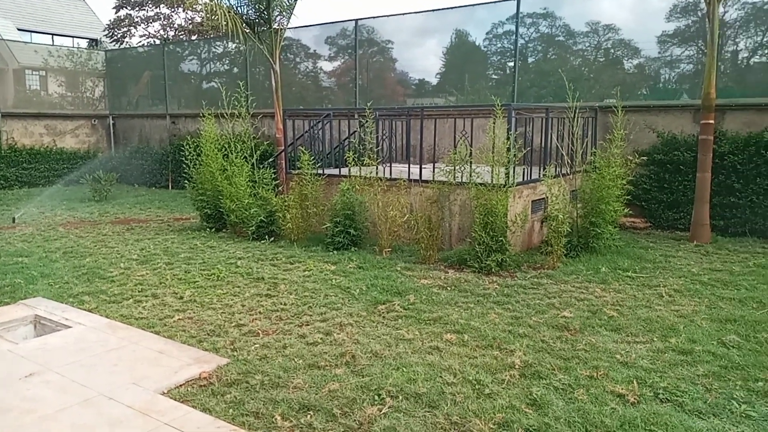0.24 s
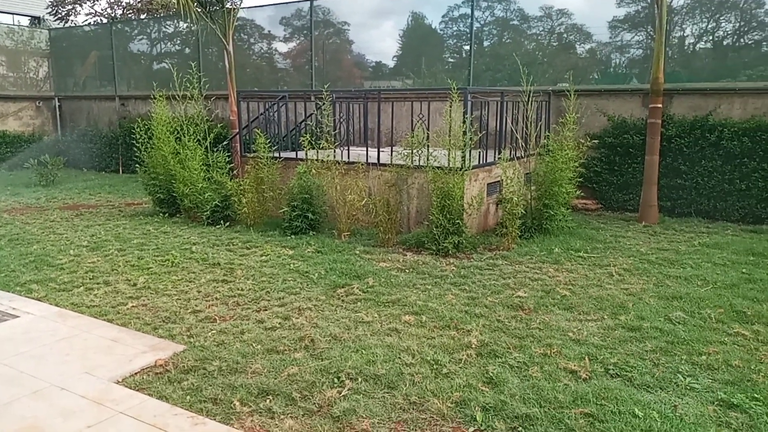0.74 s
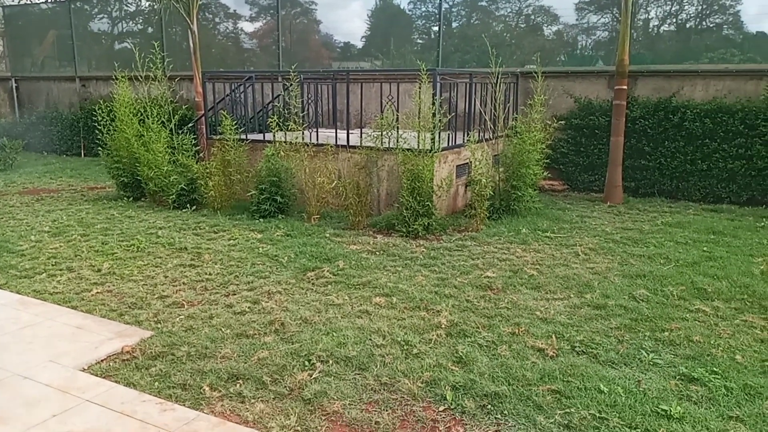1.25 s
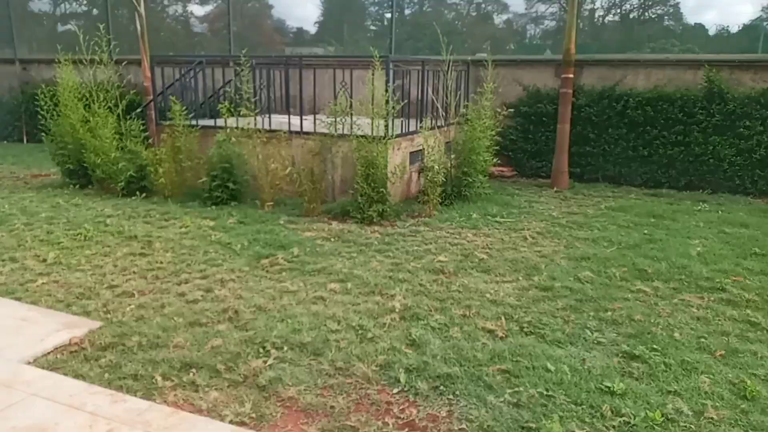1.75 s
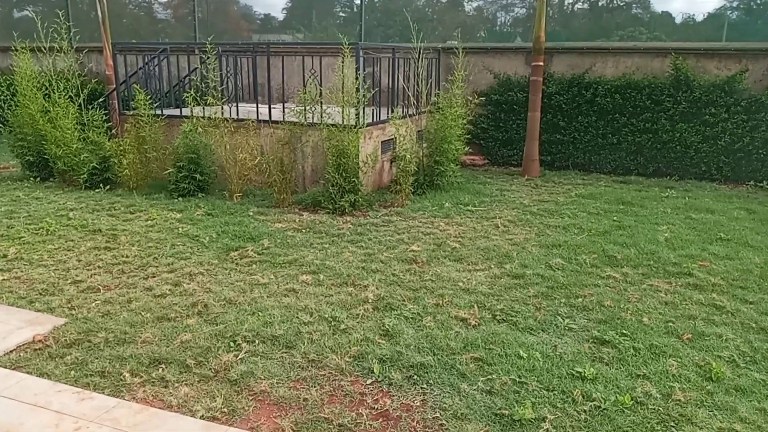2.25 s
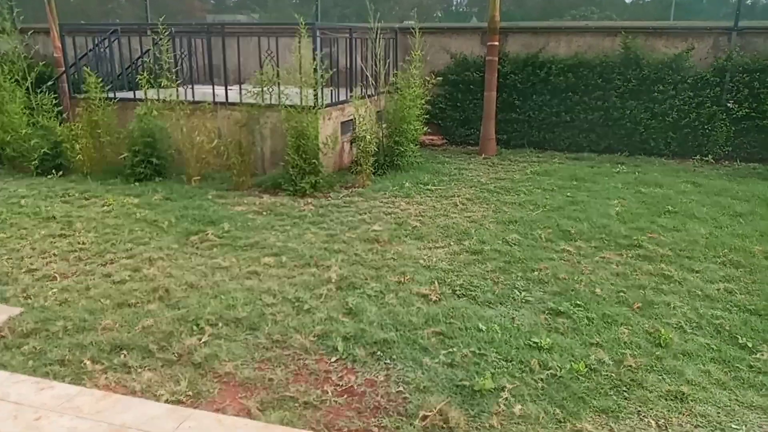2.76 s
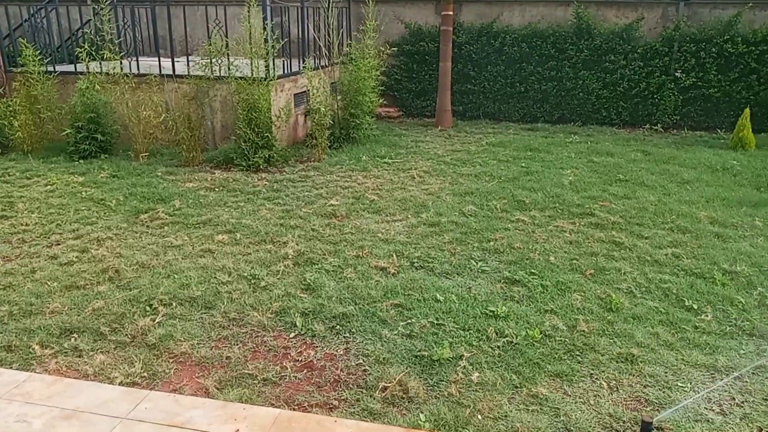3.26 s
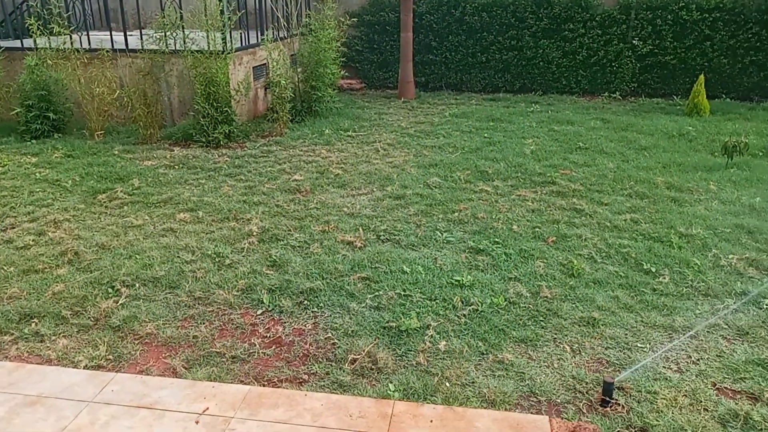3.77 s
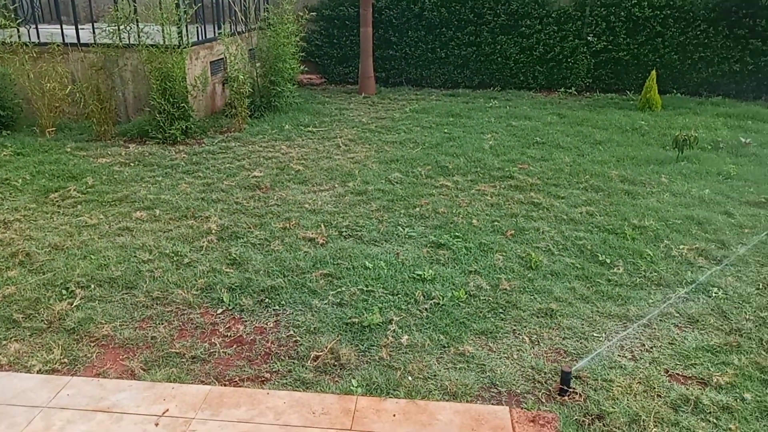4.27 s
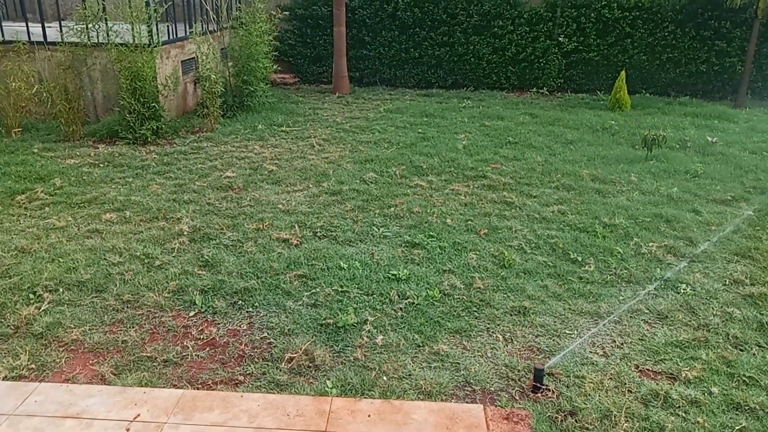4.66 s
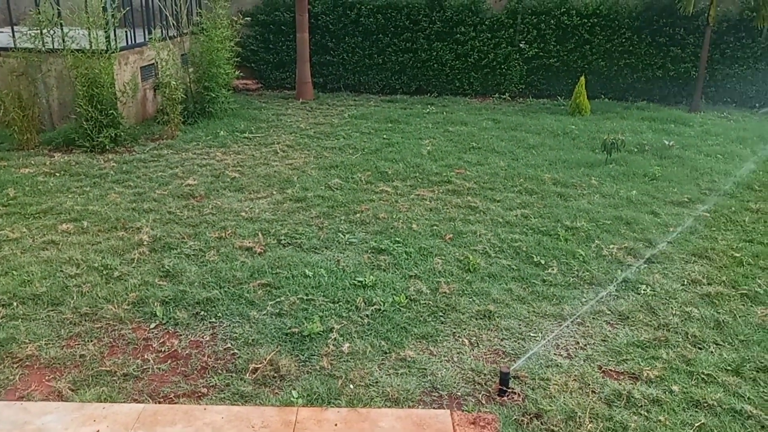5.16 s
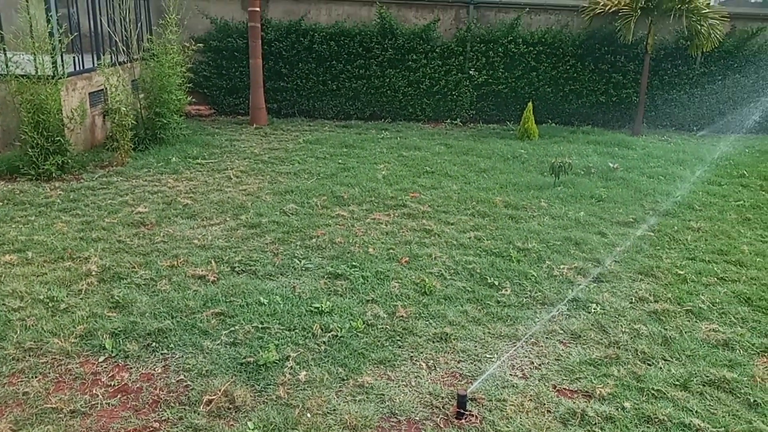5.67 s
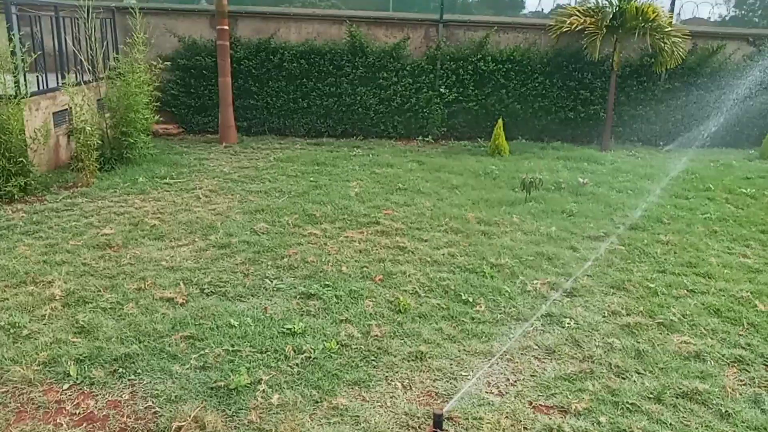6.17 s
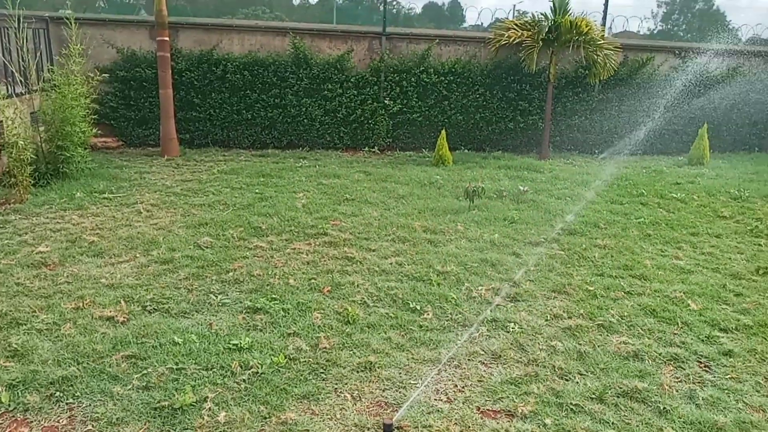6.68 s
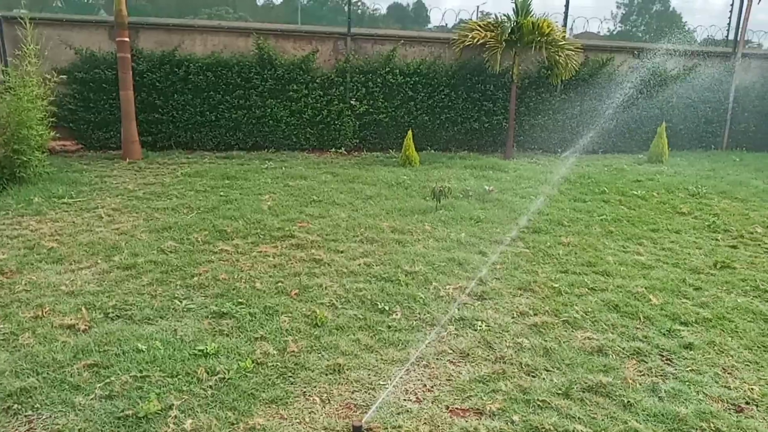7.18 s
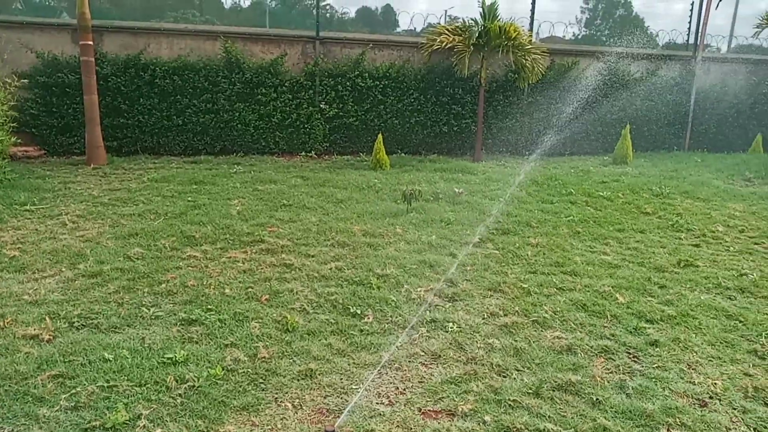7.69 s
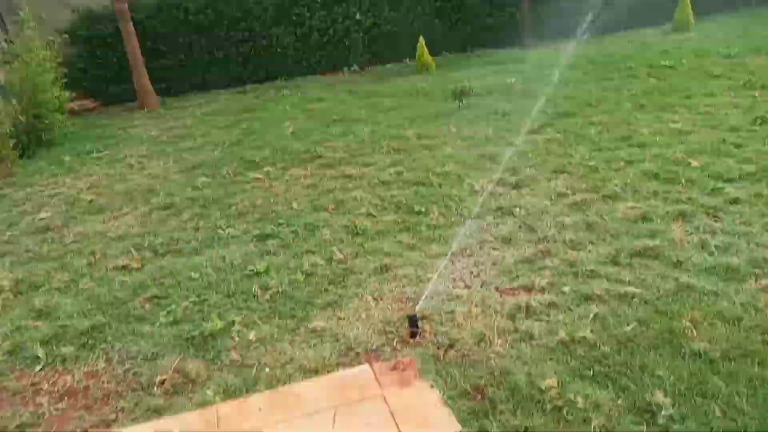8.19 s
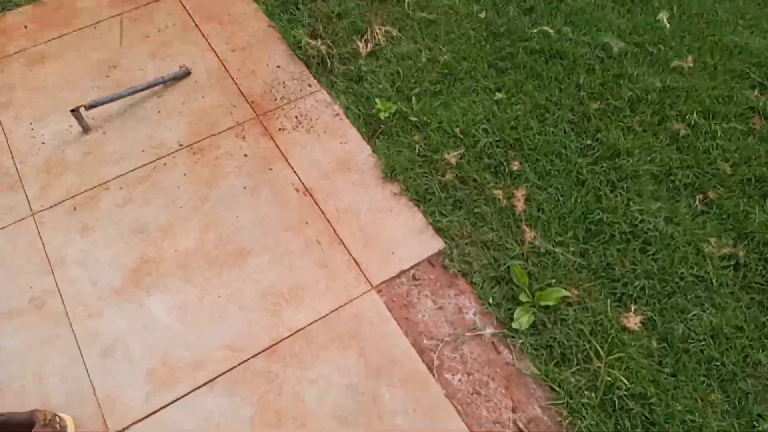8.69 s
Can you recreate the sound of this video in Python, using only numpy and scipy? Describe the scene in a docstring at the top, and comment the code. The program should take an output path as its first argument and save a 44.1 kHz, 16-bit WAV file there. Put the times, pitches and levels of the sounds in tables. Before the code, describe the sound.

A sprinkler hisses steadily over a garden lawn, spitting in short clusters of sharp ticks. Gusts rumble and thump on the hand-held microphone for the first couple of seconds, then ease off. Shoes knock and scuff on gritty tiles early on and again near the end. The hiss shifts in tone as the microphone turns. Two tiny bird chirps at the start and a distant pump hum are barely audible.

```python
"""A lawn by a tiled terrace: a pop-up sprinkler hisses as its jet breaks into droplets, and spits when
air pockets pop at the nozzle. The hiss changes colour as a hand-held camera pans and finally tilts down.
Gusts rumble and thump on the two microphone ports, shoe soles scuff over grit and knock on the tiles,
a far pump hums and a bird chirps faintly."""
import sys
import numpy as np
from scipy import signal
from scipy.fft import rfft, irfft, next_fast_len
from scipy.io import wavfile
from scipy.ndimage import uniform_filter1d

SR = 44100
rng = np.random.default_rng(int(sys.argv[2]) if len(sys.argv) > 2 else 0)


def transcribe(u):
    """Save the signal u as a 16-bit wav file named by the first command-line argument.

    u: samples, shape (n,) or (channels, n), limited to [-1, 1]; the rate is SR.
    q: integer samples, one column per channel.
    """
    v = np.clip(np.atleast_2d(u).T, -1, 1)
    q = np.round(v * 32767).astype(np.int16)
    wavfile.write(sys.argv[1], SR, q)


N = 394165

# strength of the wind: (time [s], left port [dB], right port [dB])
GUSTS = [(0, -21.5, -30.5), (.09, -50, -44), (.19, -42, -37.5), (.33, -49, -51), (.5, -31, -40),
         (.7, -31, -48), (.99, -33, -44), (1.08, -28.5, -45), (1.27, -31.5, -50), (1.39, -21, -41),
         (1.55, -35.5, -58), (1.8, -36.5, -48), (2.04, -26, -57), (2.27, -48, -48.5), (2.45, -51, -61),
         (2.52, -54, -31), (2.63, -54, -38.5), (2.75, -63, -48), (3.06, -61, -48), (3.33, -38, -57.5),
         (3.6, -62, -34.5), (3.72, -65, -59.5), (4.0, -61, -56), (4.85, -69, -75), (5.5, -82, -102),
         (6.62, -100, -59), (6.72, -70, -45.5), (6.94, -56, -45), (7.02, -75, -82), (7.47, -82, -77),
         (7.56, -53, -51.5), (7.72, -80, -64), (8.2, -63, -81), (8.94, -81, -73)]


def gain_of(db):
    """Decibels to a factor."""
    return 10 ** (np.asarray(db) / 20)


def evened(x):
    """Scales to rms 1."""
    return x / np.sqrt(np.mean(abs(x) ** 2) + 1e-20)


def smoothed(x, *sizes, across=1):
    """Moving averages along time, then across frequency bins; scaled to rms 1."""
    for size in sizes:
        x = uniform_filter1d(x, size, 0)
    return evened(uniform_filter1d(x, across))


def read(points, hz):
    """Columns of a spectrum table on a log-frequency axis."""
    f, *columns = np.transpose(points)
    return np.array([np.interp(np.log(hz + 1), np.log(f), c) for c in columns])


def follow(rows, t):
    """Columns of a curve table at the times t."""
    s, *columns = np.transpose(rows)
    return np.array([np.interp(t, s, c) for c in columns])


def coloured(x, points):
    """Filters x by a spectrum table."""
    size = next_fast_len(N)
    curve_db = read(points, np.fft.rfftfreq(size, 1 / SR))[0]
    return irfft(rfft(x, size) * gain_of(curve_db), size)[:N]


def lumps(per_s):
    """Slow random curve of rms 1."""
    pole = np.exp(-per_s * 2 * np.pi / SR)
    return evened(signal.lfilter([1], [1, -2 * pole, pole ** 2], rng.standard_normal(N)))


def add(mix, s, sound):
    """Mixes a stereo sound in at s seconds."""
    at = round(s * SR)
    part = mix[:, max(at, 0):at + sound.shape[1]]
    part += sound[:, max(-at, 0):][:, :part.shape[1]]


def sides(left_db):
    """Gains of the two ports for a left-over-right difference."""
    return 2 * np.array([[gain_of(left_db)], [1]]) / (1 + gain_of(left_db))


def spray_colour(t, hz, aim):
    """EQ of the hiss at each port in dB: it morphs with the aim while rings glide through it."""
    # tone at each port: (frequency [Hz], facing away [dB], half turned [dB], facing the jet [dB],
    # tilted down [dB])
    left_port = [(398, 6.5, 6.5, 5, 6), (800, 1, -4, -2.5, -4), (1230, -2, 1.5, 1, -1),
                 (1980, 5.5, 1, 5, 11), (2420, 8.5, 5, 6, 11.5), (2920, 2, 6, 3, 9.5),
                 (3200, 12.5, 5, 4.5, 7), (3480, 5, 10, 1.5, 2), (3800, 1.5, 6, 6.5, 2),
                 (4850, 0.5, 5.5, 8.5, 4.5), (5500, 1, 7, 5.5, 0), (6360, 6, 6.5, 5.5, 9),
                 (7300, 8.5, 8.5, 3.5, 6.5), (7800, 6, 5, 2.5, 3), (9610, 9.5, 10, 10, 11),
                 (10700, 1.5, 2.5, 1.5, 8), (13600, -3.5, -3.5, -7, -7), (14000, -1, -13, -11, -7),
                 (15070, 10, 13.5, 11.5, 14.5), (16900, 13, -9, 6, 2)]
    right_port = [(382, 4, 4.5, 3, 7.5), (750, -6, -4.5, -2, -4), (1680, 5.5, 9, 4.5, -2.5),
                  (2630, 16.5, 8.5, 0, -2), (3470, 1.5, 2.5, -3.5, 5), (3920, -20, -25, -12, 7),
                  (4810, 3, 11.5, 6, 4), (5250, 13.5, 8.5, 6, 8), (6730, 9, 10, 8, 11),
                  (7400, 1, -2, 4, -1), (7700, 0, -21, -10, -6), (9400, -5, -11, -16, -12),
                  (11200, -21, -23, -18, -20), (14000, -18, -13, -22, -20), (15200, -4, -10, -8, -14),
                  (16200, -16, -24, 6, -8)]
    # steady rings and trim, a row per aim: (left ring [dB], right ring [dB], spray level [dB])
    rings = [(1, -1, -2), (-2.5, -1.5, -2.5), (3.5, 13, -1.98), (-2.5, 5, -1.5)]
    # main ring of the hiss on the left: (time [s], pitch [Hz], boost [dB])
    main_ring = [(0, 2620, 7), (.25, 2870, 12), (.6, 2620, 10.5), (1.25, 2620, 16.5), (1.6, 2580, 10),
                 (2.2, 2700, 4), (2.45, 2600, 3), (3.0, 2470, 4), (3.6, 2370, 2), (4.4, 2410, 10.5),
                 (5.2, 2470, 12), (5.9, 2430, 8.5), (6.4, 2420, 14), (6.9, 2380, 15.5), (7.8, 2390, 11.5),
                 (8.1, 2270, 5), (8.45, 2340, -6), (8.6, 2240, -1), (8.94, 2260, -8)]
    # the jet sweeping round: (time [s], broad right ring [Hz], its boost [dB], left treble [dB])
    sweep = [(0, 6160, -1, 0.5), (.8, 6400, 5.5, 1), (1.8, 5660, 2.5, 0), (2.6, 5780, 5, -0.5),
             (3.4, 5630, 7.5, -2), (4.0, 5650, 8.5, 0), (4.6, 5660, 10, 1), (5.1, 5700, 10, 0),
             (5.4, 5600, 9, -1.5), (6.3, 5630, 9, -2), (6.9, 5640, 8.5, -0.5), (7.8, 5630, 9.5, -1),
             (8.3, 5900, 3.5, -1.5), (8.94, 6260, -1, -2)]
    # nozzle whistle on the right: (time [s], pitch [Hz], boost [dB])
    whistle = [(0, 6200, 0), (2.2, 6150, 2), (3.8, 5800, 2), (5.1, 5560, 2), (5.5, 5450, 5), (5.9, 5400, 6),
               (6.4, 5350, 5.5), (7.0, 5300, 2), (7.8, 5300, 2), (8.2, 5450, 0), (8.94, 5450, 0)]
    # inverted ground echo that combs the left mids: (time [s], delay [ms], level [dB])
    ground_echo = [(0, 0.98, 3), (.8, 0.97, -11), (2.5, 0.89, 1), (3.5, 0.9, -12), (4.6, 0.87, -4),
                   (5.4, 0.88, -29), (6.4, 0.86, -19), (6.9, .85, -14), (7.9, 0.86, -6), (8.15, 0.72, 2),
                   (8.45, 0.8, 0), (8.62, 0.62, -5), (8.94, 0.93, -5)]
    # brief dip on the left as the camera swings down: (frequency [Hz], gain [dB])
    dip = [(3300, 0.5), (4300, -4), (5000, -8), (5700, -9), (6300, 1), (13000, -2.5), (15000, -14)]
    # body of the hiss below about 1500 Hz: (time [s], gain [dB])
    low_hiss = [(0, 1.5), (1.5, 1), (2.5, 0), (3.6, 1.5), (4.4, 0), (5.0, -1.5), (5.7, 0.5), (6.5, 0),
                (7.4, 1), (8.2, 0), (8.94, -0.5)]
    f = hz[:, None]

    def bell(centre_hz, width_hz):
        return np.exp(-((f - centre_hz) / width_hz) ** 2)

    blend = np.clip(1 - abs(aim - np.arange(4)[:, None]), 0, 1)
    left_ring_db, right_ring_db, trim_db = np.transpose(rings) @ blend
    ring_hz, ring_db = follow(main_ring, t)
    broad_hz, broad_db, treble_db = follow(sweep, t)
    whistle_hz, whistle_db = follow(whistle, t)
    echo_ms, echo_db = follow(ground_echo, t)
    echo = gain_of(echo_db) * bell(5300, 2600) * np.exp(-2j * np.pi * f * echo_ms / 1000)
    gurgle_pitch, gurgle_level = (smoothed(r, 9, 9) for r in rng.standard_normal((len(t), 2)).T)

    left = read(left_port, hz).T @ blend + left_ring_db * bell(1700, 180)
    left += (ring_db + 1.3 * gurgle_level) * bell(ring_hz + 45 * gurgle_pitch, 180)
    left += 20 * np.log10(abs(1 - echo) + 0.32)
    left += read(dip, hz).T * np.exp(-((t - 8.45) / .14) ** 4)
    left += treble_db * np.clip(f / 1000 - 6, 0, 1)
    right = read(right_port, hz).T @ blend + right_ring_db * bell(2800, 180)
    right += broad_db * bell(broad_hz, 550) + whistle_db * bell(whistle_hz, 170)
    body_db = follow(low_hiss, t) * np.clip(2 - f / 1000, 0, 1)
    return np.array([left, right]) + trim_db + body_db


def spray(base_db=-74, patchy_db=1.25, flicker_db=1.2, streak_db=2.0):
    """Hiss of jet and droplets; each port colours it, and the left hears it late by several paths."""
    # camera move: (time [s], aim [0 away, 1 half turned, 2 at the jet, 3 down], left delay [ms])
    camera_move = [(0, 0, .63), (.8, .1, .68), (2.5, .8, .76), (3.5, 1, .8), (4.6, 1.6, .86),
                   (5.4, 1.8, .91), (6.5, 2, .96), (7.9, 2, 1.02), (8.15, 3, 1.12), (8.45, 3, 1.16),
                   (8.62, 3, 1.18), (8.94, 3, 1.22)]
    # paths round hand and body to the left port: (delay [ms], gain [factor], moves with the aim [0/1])
    arrivals = [(0, 0.78, 1), (-.27, -0.26, 1), (.19, 0.025, 1), (1.589, -0.25, 0), (1.809, 0.73, 0),
                (1.969, -0.71, 0)]
    # hiss common to both ports: (frequency [Hz], share of power [0-1])
    common = [(300, 0.95), (900, 0.3), (2300, 0.79), (3800, 0.17), (5500, 0.17), (8000, 0.24),
              (15000, 0.25)]
    t, hz = np.arange(N // 256 + 5) * 256 / SR, np.fft.rfftfreq(1024, 1 / SR)
    aim, lag_ms = follow(camera_move, t)
    noise = rng.standard_normal((len(t), 513, 11)).T
    jet, left_only, right_only = noise[0:6:2] + 1j * noise[1:6:2]
    paths = sum(gain * np.exp(-2j * np.pi * hz[:, None] * (ms + moves * lag_ms) / 1000)
                for ms, gain, moves in arrivals)
    share = read(common, hz).T
    hiss = np.sqrt(share) * np.array([jet * paths / abs(paths), jet])
    hiss += np.sqrt(1 - share) * np.array([left_only, right_only])

    patches = smoothed(noise[6].T, 7, across=12).T
    # reflections from lawn and walls: narrow ripples that drift as the camera moves
    ripples_db = np.array([db * smoothed(uniform_filter1d(r.T, 4), 150, across=4).T
                           for db, r in zip((1, .5), noise[7:9])])
    # narrow streaks that come and go in the hiss
    streaks = np.array([smoothed(r.T, 24, across=3).T for r in noise[9:]])
    # the jet breaks up unevenly, which is heard most in the highest treble
    flicker = smoothed(rng.standard_normal(len(t)), 6) * np.clip(hz / 15000, 0, 1)[:, None] ** 2
    texture_db = patchy_db * patches + ripples_db + flicker_db * flicker + streak_db * streaks
    hiss *= gain_of(base_db + spray_colour(t, hz, aim) + texture_db)
    return signal.istft(hiss, nperseg=1024, noverlap=768)[1][:, :N]


def wind(lumpy_db=3.0):
    """Turbulence rumbles separately on each port and brightens as it blows harder."""
    # tone of weak and of strong wind: (frequency [Hz], level [dB])
    breeze = [(25, -23), (60, -1.5), (90, 0), (140, -11), (250, -29.5), (500, -90), (1000, -82)]
    gale = [(25, -50), (60, -6), (110, 8), (220, 2), (330, -12.5), (600, -27), (1200, -76)]
    out = np.zeros((2, N))
    for port, gust_db in enumerate(follow(GUSTS, np.arange(N) / SR)):
        level_db = gust_db + lumpy_db * np.minimum(lumps(per_s=25), 1.6)
        force = np.clip((level_db + 51) / 26, 0, 1) ** 2
        weak, strong = (evened(coloured(rng.standard_normal(N), tone)) for tone in (breeze, gale))
        out[port] = gain_of(level_db) * (np.sqrt(1 - force ** 2) * weak + force * strong)
    return out


def small_eddies(count=160):
    """Rows for lesser thumps at random moments, scaled to the wind at their port."""
    when, side, size, pitch, length = rng.random((count, 5)).T
    s, port = when * N / SR, np.round(side)
    left_db, right_db = follow(GUSTS, s)
    db = np.where(port, right_db, left_db) - 1.5 + 13 * size
    hz, ms = np.interp(pitch, (0, 1), (78.5, 130)), np.interp(length, (0, 1), (5.4, 22))
    return list(zip(s, db, hz, ms, port))


def thumps(glide=0.262):
    """Eddies burst on one port: a short low pressure swing, with more octave snap when loud."""
    # strongest eddies, and a few faint low plops near 300 Hz: (time [s], level [dB], pitch [Hz], half length
    # [ms], port [0 left, 1 right])
    big_eddies = [(0.068, -27.5, 111, 11, 0), (0.193, -26.5, 85.7, 16, 1), (0.207, -25.5, 97.5, 9.2, 0),
                  (0.404, -27, 101, 7.6, 0), (0.433, -23, 89.5, 19, 0), (0.535, -21.5, 147.4, 19, 0),
                  (0.602, -16, 117.4, 11, 0), (0.691, -15, 124.5, 1.5, 0), (0.794, -28, 129.6, 8.8, 0),
                  (0.88, -22.5, 130, 24, 0), (1.009, -32, 156, 3.9, 0), (1.057, -11, 120.4, 4.3, 0),
                  (1.118, -21, 136.7, 2.1, 0), (1.257, -20, 114, 6.2, 0), (1.282, -18, 120.4, 8.4, 0),
                  (1.308, -19, 151.5, 2.5, 0), (1.339, -27, 183, 12.4, 0), (1.377, -17, 165, 2.4, 0),
                  (1.394, -15.5, 183, 6.6, 0), (1.507, -12, 135.6, 5.4, 0), (1.536, -21.5, 144, 11, 0),
                  (1.612, -20, 130, 9.9, 0), (1.646, -24.5, 166, 15, 0), (1.716, -27, 112, 9, 1),
                  (1.754, -22, 88, 4.8, 0), (1.879, -30, 119.4, 30, 0), (2.019, -19.5, 115, 11, 0),
                  (2.069, -17.5, 142.4, 6.8, 0), (2.106, -22.5, 130, 2.8, 0), (2.139, -29, 82, 20, 0),
                  (2.516, -22.5, 114.7, 7.1, 1), (2.578, -17.5, 103.3, 4.1, 1), (2.811, -30.5, 140.4, 9, 1),
                  (3.036, -27, 113, 3.9, 1), (3.236, -32.5, 89.5, 16, 0), (3.417, -24, 125.6, 3.8, 1),
                  (3.592, -26.5, 105, 19.6, 1), (3.858, -48.5, 319, 14, 0), (3.953, -36.5, 87, 14, 1),
                  (4.036, -43.5, 335, 8.9, 0), (4.028, -39, 77, 21, 1), (6.696, -29.5, 122.3, 9.8, 1),
                  (6.881, -28.5, 104, 4, 1), (7.771, -47.5, 322, 11, 0), (8.086, -48, 316, 13, 0),
                  (8.53, -53, 322, 41, 0)]
    out, t = np.zeros((2, N)), np.arange(-2000, 2000) / SR
    for s, db, hz, ms, port in small_eddies() + big_eddies:
        phase, bend = rng.random(2)
        shape = np.exp(-(1000 * t / ms) ** 2)
        cycles = np.cumsum(hz * (1 + glide * bend * (shape - .9))) / SR + phase  # quickest at the peak
        snap = gain_of(-2 + 0.52 * db) * shape * np.sin(4 * np.pi * (cycles + bend))
        thump = gain_of(db) * shape * (np.sin(2 * np.pi * cycles) + snap)
        add(out, s + t[0], thump * (np.arange(2)[:, None] == port))
    return out


def scuff(length, level_db, left_db, low_db, second_db, top_db, pitch, widen, grains_per_s=12000):
    """Grit clicks through the resonances of the tiles; the stroke bites quickly, judders and trails off."""
    # tiles under the sole: (frequency [Hz], width [Hz], level [dB])
    tile_modes = [(770, 330, 4), (1544, 910, 9.5), (2365, 960, 7), (3300, 2000, 9.5)]
    u = np.arange(0, length, 1 / SR) / length
    chance, size, sign, slip = rng.random((round(.4 * SR), 4))[:len(u)].T
    grit = (chance < grains_per_s / SR) * np.sign(sign - .5) * gain_of(-2 * np.log(size + 0.0041))
    grit = signal.sosfilt(signal.butter(6, 3500, fs=SR, output="sos"), grit)  # rubber damps the treble
    rub = 0
    for (hz, width, db), trim_db in zip(tile_modes, (low_db, second_db, 0, top_db)):
        mode = signal.iirpeak(hz * pitch, hz * pitch / (width * widen), SR)
        rub += gain_of(db + trim_db) * evened(signal.lfilter(*mode, signal.lfilter(*mode, grit)))
    judder_db = 1.4 * smoothed(slip - .5, 250, 250)
    ramps = np.minimum(np.minimum(u / 0.11, 20 * (1 - u)), 1)
    stroke = ramps * gain_of(level_db - 14 * u ** 2 + judder_db)
    return stroke * evened(rub) * sides(left_db)


def shoes(rise_s=.0007, walls_db=-9, walls_t60=0.13):
    """Knocks ring the sole and nearby walls answer; scuffs drag it over grit."""
    # sole hits: (time [s], level [dB], left over right [dB], low-mode trim [dB], pitch [factor])
    knocks = [(0.6605, -21.5, 8, -42, 1.1), (.672, -48, 7, -17, 1.1), (.742, -37, 8, -30, 1.23),
              (1.068, -25.5, 6, -25, 0.98), (1.0897, -22, 7, -25, 0.99), (1.101, -33, 0, -14, 0.81),
              (3.401, -36, 2, -36, 1.12), (3.762, -34, 10, -30, 1.17), (7.9829, -32, 0, -20, 1.3),
              (7.9856, -41, 10, -14, 0.9), (8.002, -37, 6, -24, 1.33), (7.9828, -39.5, 29, -12, 0.89),
              (8.117, -40, 10, -14, 1.35), (8.141, -44, 10, -10, 1.07), (8.153, -42, 12, -15, 1.4),
              (8.202, -35, 14, -20, 1.16), (8.207, -31, 14, -20, 0.9), (8.211, -41, 14, -10, 1.5),
              (8.218, -34, 12, -15, 0.9), (8.851, -38, 12, -30, 1.18)]
    # ring of the sole: (frequency [Hz], level [dB], t60 [s])
    sole_modes = [(745, -21, 0.056), (1396, 18, 0.017), (2140, 5, 0.011), (3180, -15, 0.038)]
    # sole drags: (start [s], length [s], level [dB], left over right [dB], lowest mode [dB],
    # second mode [dB], top mode [dB], pitch [factor], mode width [factor])
    scuffs = [(0, 0.19, -52.5, 6, 5, 12, 0, 0.88, 0.57),
              (0.657, 0.039, -36.5, 11, 7.5, -12, -8, 0.87, 0.72),
              (0.683, 0.25, -44.5, 11, 5.5, -20, -4, 1, 0.56),
              (0.707, 0.082, -45, 9, -27, 10, 2, 1.15, 0.44),
              (0.797, 0.125, -51, 7, -27, 11, -11, 1.18, 0.32),
              (1.063, 0.027, -39.5, 19, 18, 8, -10, 0.98, 0.92),
              (1.082, 0.056, -41.5, 10, 7, -16, -15, 0.93, 1.2), (2.49, .1, -42, 18, -27, 13, 0, 0.94, 0.3),
              (2.49, .27, -54, 18, 16, -14, -20, 1.33, 0.6),
              (2.484, .32, -48.5, 12, -27, -5, -10, 0.99, 0.2),
              (3.763, 0.069, -46.5, 9, -27, -20, -16, 1.04, 0.25),
              (7.981, 0.32, -49.5, 21, 3, 1, 1, 1.02, 1.0),
              (8.116, 0.19, -42.5, 14, -2, 7.5, -7, 1.13, 1.5),
              (8.193, 0.043, -40, 14, -9, -9, -2, 0.92, 1.1), (8.218, 0.19, -48, 21, -4, -5, -4, 1.02, 1.2),
              (8.286, 0.14, -48, 25, -3.5, -5, -1.5, 1.33, 1.25),
              (8.335, 0.1, -50, 26, -1.5, -5.5, -6, 0.98, 1.34),
              (8.395, 0.054, -59, 20, -27, -27, 17, 1.2, 0.3),
              (8.386, 0.21, -60, 17, 18, -16, -10, 0.97, 0.62),
              (8.598, 0.21, -59, 17, 13, 1, -6, 0.85, 0.28)]
    out, t = np.zeros((2, N)), np.arange(2600) / SR
    for s, db, left_db, low_db, pitch in knocks:
        ring = sum(gain_of(mode_db + low_db * (hz < 1500) - 60 * t / t60)
                   * np.sin(2 * np.pi * hz * pitch * t) for hz, mode_db, t60 in sole_modes)
        add(out, s, gain_of(db) * ring * np.minimum(t / rise_s, 1) * sides(left_db))
    tail = rng.standard_normal((2, 6000)) * gain_of(-60 * np.arange(6000) / SR / walls_t60)
    out += gain_of(walls_db) * signal.oaconvolve(out, tail / np.linalg.norm(tail[0]), axes=1)[:, :N]
    for s, *stroke in scuffs:
        add(out, s, scuff(*stroke))
    return np.array([np.roll(out[0], 60), out[1]])  # the left port is farther from the feet


def pump(hum_hz=82):
    """A far pump's hum and its octave, wavering in pitch and level."""
    # swell of the hum: (time [s], fundamental [dB], octave [dB])
    swell = [(0, -75, -79), (2.3, -72, -70), (3.4, -73, -77), (6.3, -73, -78), (6.5, -82, -82),
             (8.47, -82, -80), (8.53, -82, -64), (8.6, -82, -67), (8.68, -82, -61), (8.78, -82, -68),
             (8.86, -82, -67), (8.94, -82, -55)]
    cycles = np.cumsum(hum_hz * (1 + 0.0205 * lumps(per_s=8.34))) / SR
    low_db, octave_db = follow(swell, np.arange(N) / SR) - 0.5 * lumps(per_s=34)
    hum = gain_of(low_db) * np.sin(2 * np.pi * cycles) + gain_of(octave_db) * np.sin(4 * np.pi * cycles)
    return np.sqrt(2) * np.array([np.roll(hum, 44) * gain_of(1.5), hum * gain_of(-1.5)])


def bird(rough_hz=90):
    """Short chirps from far off on the left, made husky by a fast pitch wobble."""
    # calls: (time [s], length [s], start pitch [Hz], end pitch [Hz], level [dB])
    chirps = [(0.167, 0.029, 5300, 5250, -56), (0.8, .04, 4460, 4500, -52)]
    out = np.zeros((2, N))
    for s, length, from_hz, to_hz, db in chirps:
        u = np.arange(0, length, 1 / SR) / length
        wobble = smoothed(rng.standard_normal(round(.1 * SR)), 60)[:len(u)]
        hz = from_hz + (to_hz - from_hz) * u + rough_hz * wobble
        tone = np.sin(2 * np.pi * np.cumsum(hz) / SR)
        add(out, s, gain_of(db) * np.sin(np.pi * u ** 0.43) * tone * sides(left_db=14))
    return out


def spits(small_db=-47.5, per_s=90, burst_t60=.028, fizz_t60=.08):
    """Air pockets pop at the nozzle: a sharp tick with a short fizz; small ones crowd round the large."""
    # strongest pops: (time [s], level [dB])
    big_pops = [(0.3098, -31), (0.3886, -31), (0.5677, -32), (0.5887, -31), (0.6361, -31), (4.470, -30),
                (4.474, -30), (4.603, -31), (4.686, -29), (4.735, -25), (4.739, -26), (4.880, -28),
                (5.018, -31), (5.078, -30), (6.9138, -30), (7.0431, -29), (0.403, -23), (0.4778, -26),
                (0.5222, -23), (0.7333, -20), (0.8609, -20), (2.1021, -28), (4.101, -25), (4.371, -27),
                (4.5757, -21), (4.6907, -28), (4.7266, -22), (4.7571, -27), (4.777, -27), (4.868, -17.5),
                (5.0925, -15.5), (5.3073, -32), (5.5782, -29), (6.762, -30), (6.8109, -22.5), (6.8588, -25),
                (6.9476, -25), (6.979, -27), (6.984, -23), (7.0815, -16.5), (7.2908, -34), (7.5457, -23)]
    # tone of the tick and of the fizz: (frequency [Hz], gain [dB])
    tick_tone = [(2000, -48), (6000, 12), (10500, 21), (13000, 21), (15300, 33), (17000, 23)]
    fizz_tone = [(2000, -60), (6000, 2), (10500, 14), (13000, 10), (15300, 22), (17000, 28)]
    # the right port hears them weaker: (frequency [Hz], gain against the left [dB])
    right_shade = [(2000, -21), (6000, -8), (8500, -30), (13500, -26), (15300, -14)]
    # mean peak of the two ports, one nearly deaf to the tick
    tick_peak = coloured(signal.unit_impulse(N, 999), tick_tone).max() / 2
    pops = np.zeros(N)
    for s, db in big_pops:
        pops[round((s + .001) * SR)] = gain_of(db) / tick_peak
    crowding = .4 + smoothed(pops, 9000, 9000)
    small = gain_of(small_db + 4 * np.minimum(rng.exponential(1, N), 3.5)) / tick_peak
    pops += small * (rng.random(N) < crowding * per_s / SR)
    t = np.arange(4000) / SR
    decay = gain_of(-14 - 60 * t / burst_t60) + gain_of(-25 - 60 * t / fizz_t60)
    fizz = signal.oaconvolve(pops, decay)[:N] * rng.standard_normal(N)
    ticks = gain_of(-4) * pops * rng.choice([-1, 1], N)
    left = coloured(ticks, tick_tone) + coloured(fizz, fizz_tone)
    return np.array([np.roll(left, 36), coloured(left, right_shade)])


def scene():
    """Sprinkler, shoes and bird pass the microphone's bass roll-off; wind and hum join after it."""
    roll_off = signal.butter(2, 130, "high", fs=SR, output="sos")
    air = signal.sosfilt(roll_off, spray() + spits() + shoes() + bird())
    return air + wind() + thumps() + pump()


def record(dry):
    """A 45 Hz rumble filter, then a steep band limit at 15850 Hz."""
    cut = signal.sosfilt(signal.butter(2, 45, "high", fs=SR, output="sos"), dry)
    band_limit = signal.firwin(1023, 15850, window=("kaiser", 9), fs=SR)
    return signal.oaconvolve(cut, band_limit[None], "same")


dry = scene()
out = record(dry)
transcribe(out)
```